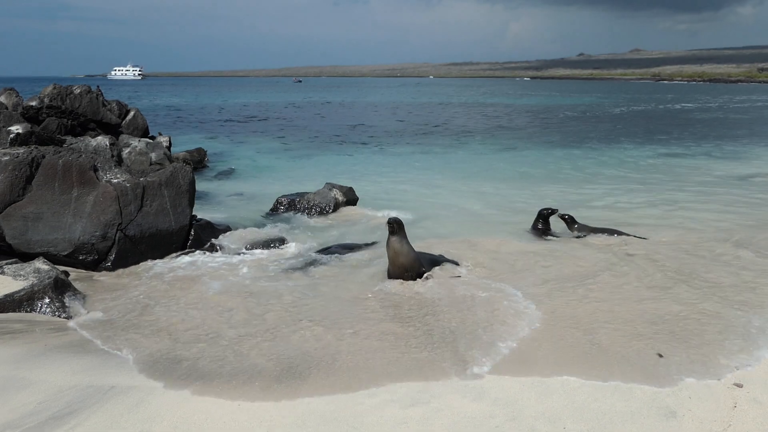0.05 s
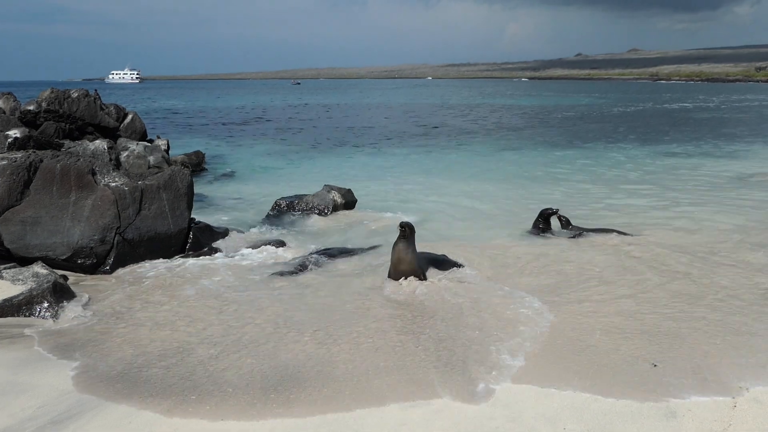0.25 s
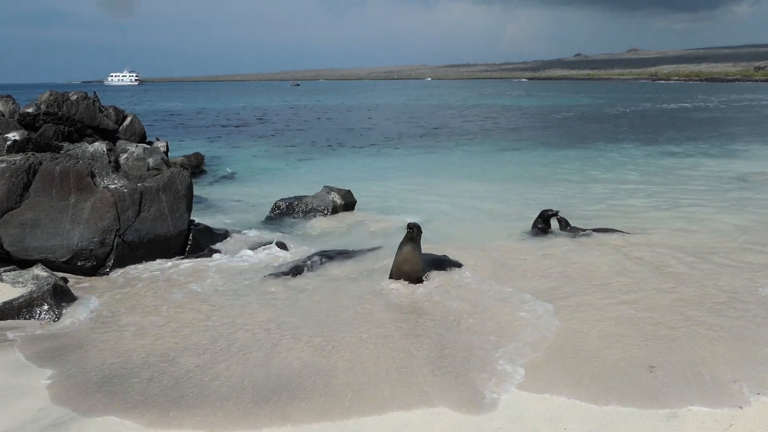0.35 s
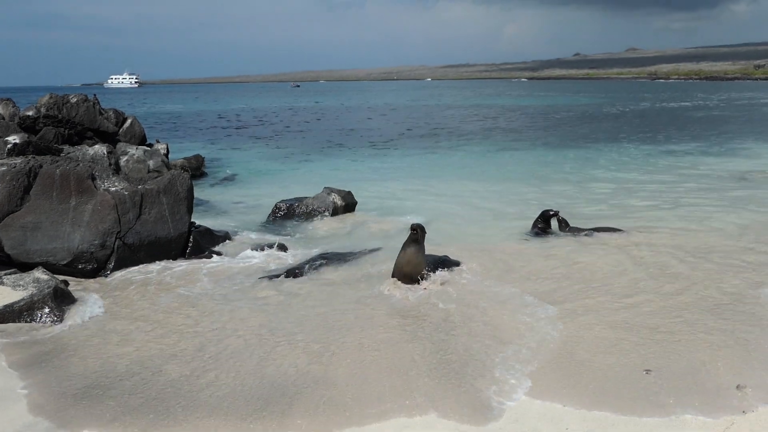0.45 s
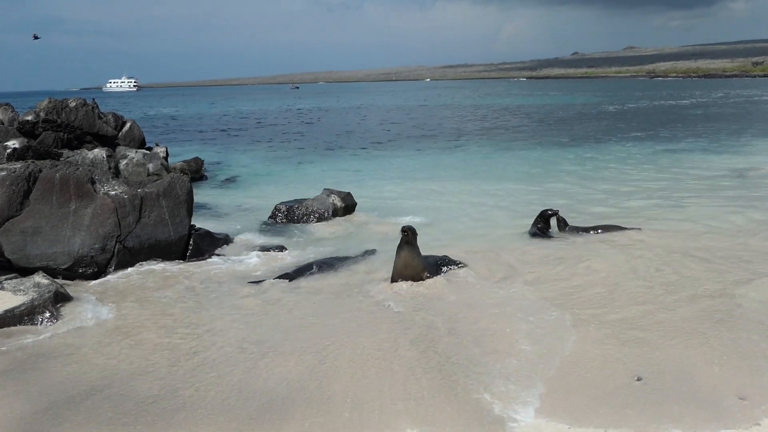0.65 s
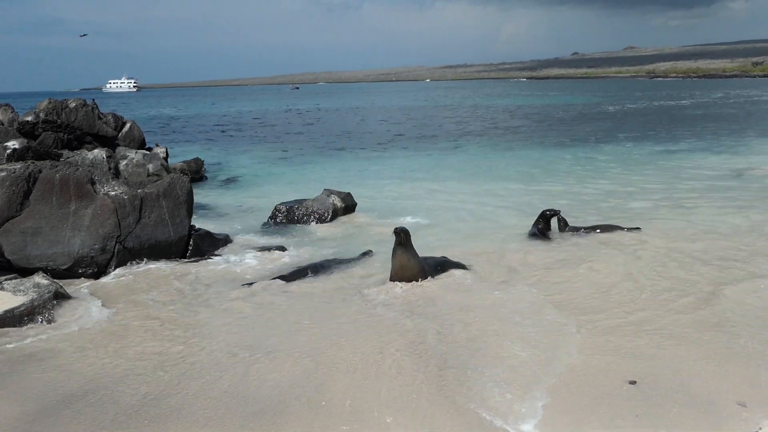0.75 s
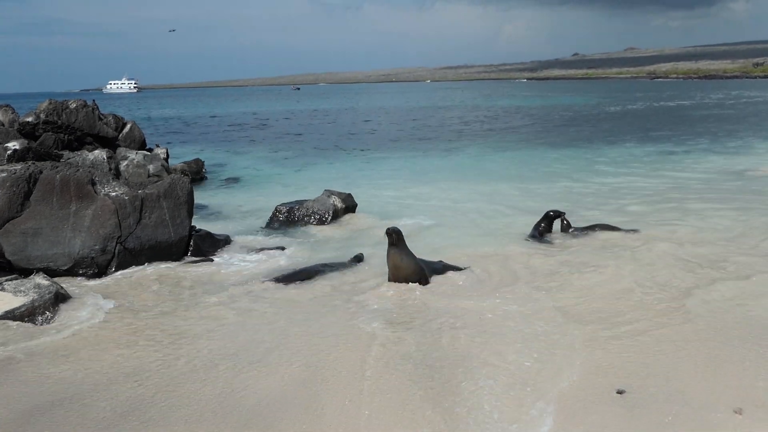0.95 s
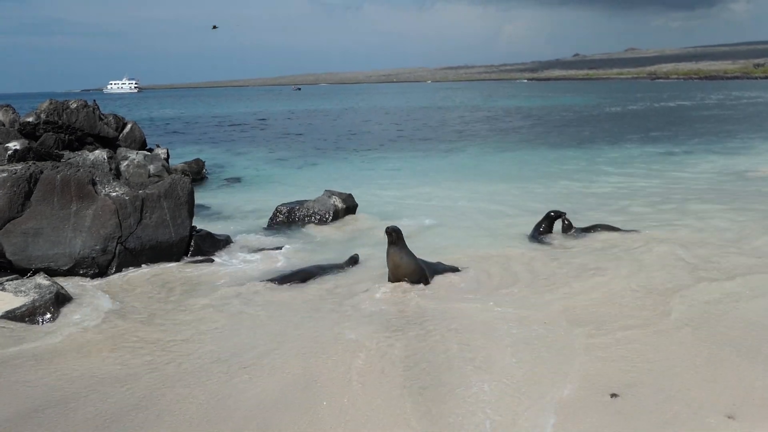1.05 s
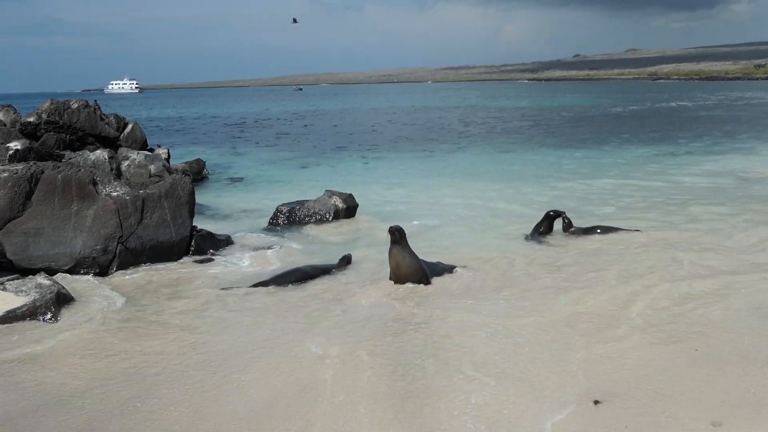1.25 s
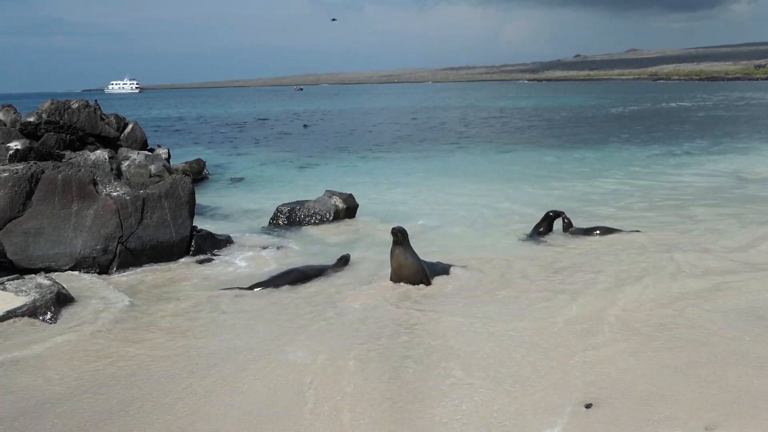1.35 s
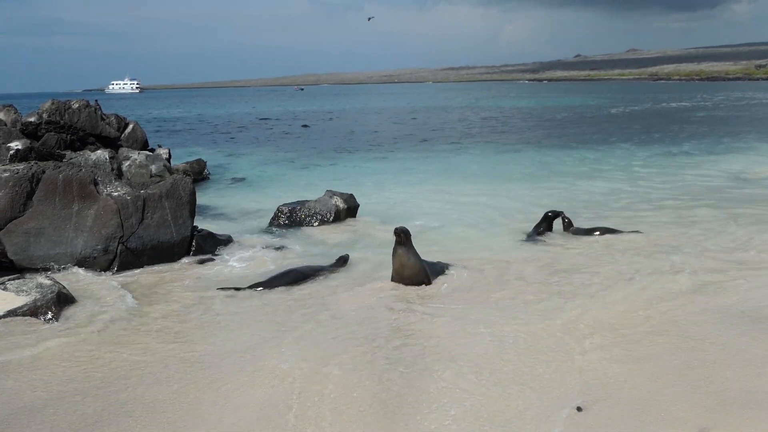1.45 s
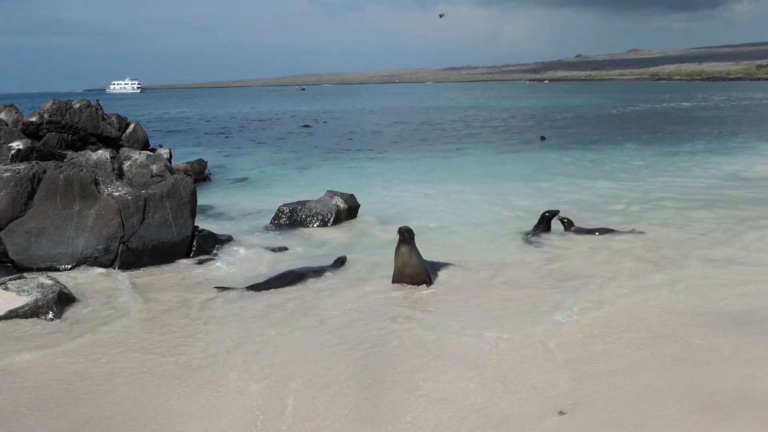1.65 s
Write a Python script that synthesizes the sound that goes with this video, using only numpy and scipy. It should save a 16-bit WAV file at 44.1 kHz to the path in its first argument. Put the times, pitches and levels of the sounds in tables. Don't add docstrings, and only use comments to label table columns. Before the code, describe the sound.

A sea lion growls close by: after silence until 0.19 s, the sound starts abruptly with a low, breathy rattle, coarse slaps thickening from 0.45 s, swelling to a short, throaty bark at 0.64-0.75 s that falls in pitch and ends by 0.83 s. Small waves wash, gurgle and fizz throughout with faint wind rumble. Another animal moans faintly at 0.83-1.14 s; foam sizzles from 1.1 s with tiny bubble pops.

```python
import sys
import numpy as np
from scipy import signal
from scipy.io import wavfile
from scipy.ndimage import uniform_filter1d

SR = 44100
rng = np.random.default_rng(int(sys.argv[2]) if len(sys.argv) > 2 else 0)


def unload_audio(sound):
    columns = np.transpose(np.atleast_2d(sound))
    steps = np.round(np.clip(columns, -1, 1) * 32767)
    wavfile.write(sys.argv[1], SR, steps.astype(np.int16))


def convert_level_to_amplitude(level_db):
    exponent = np.asarray(level_db, float) / 20
    return 10 ** exponent


N = 74970

# time_s, effort_db, flap_rate_hz, breath_share (0-1), unevenness (0-1)
CALL = [(.18, -35, 65.2, 1, 0.3), (.32, -27, 59.7, 0.55, .1), (.39, -30, 79.6, 0.99, 0.42),
        (.5, -28, 90.4, 0.75, 0.2), (.645, -22.5, 105, 1, 0.2), (.675, -16.5, 152, 1, .15),
        (.703, -21, 132, 0.64, 0), (.73, -18.5, 128, 0.44, 0.03), (.738, -25, 118, 0.66, 0.05),
        (.775, -27.5, 103, 0.68, 0.02), (.83, -30.5, 95, 0.1, 0.03)]
# time_s, first_hz, nasal_hz, second_hz, third_hz
MOUTH = [(.18, 630, 780, 1500, 2450), (.32, 590, 790, 1450, 2450), (.42, 600, 880, 1400, 2470),
         (.47, 520, 760, 1340, 2550), (.5, 400, 760, 1330, 2650), (.63, 410, 820, 1350, 2660),
         (.665, 480, 830, 1390, 2620), (.72, 520, 830, 1345, 2550), (.83, 500, 800, 1290, 2440)]
# width_hz, level_db
MOUTH_RINGS = [(102, -4), (90, -13), (153, -3.5), (295, -8.5)]
# centre_hz, width_hz, level_db
THROAT = [(285.5, 57, -4), (2130, 117, -16.5), (3153, 276, -11), (4096, 270, -13.5), (4370, 1200, -34.5),
          (5300, 68, -30.5)]
# time_s, level_db
JAW_OPENING = [(.18, -4.5), (.32, 4), (.39, -7.5), (.46, 2.5), (.55, 2), (.63, 3), (.7, 5.5), (.77, 1),
               (.83, 1)]
# time_s, peak_db
SLAPS = [(0.216, -18.5), (0.2227, -17), (0.2524, -22), (0.2776, -36), (0.29, -31), (0.3037, -17),
         (0.3204, -22), (0.336, -18), (0.3664, -31), (0.427, -26), (0.4655, -16), (0.477, -13.5),
         (0.4868, -17), (0.501, -13), (0.5265, -13), (0.535, -18), (0.5697, -12.5), (0.5947, -22),
         (0.604, -27), (0.6132, -19), (0.6231, -11), (0.6398, -5.5), (0.6563, -12), (0.673, -16),
         (0.6824, -12), (0.6959, -8)]
# time_s, pitch_hz, level_db
CHEST_TONE = [(.65, 292, -36), (.675, 288, -29), (.7, 284, -22), (.724, 266, -22), (.744, 240, -31),
              (.765, 228, -28), (.78, 220, -31), (.8, 212, -34), (.815, 205, -45)]
# time_s, pitch_hz, level_db
FLUTTERS = [
    [(.497, 400, -31), (.515, 400, -27), (.575, 395, -31), (.6, 400, -29), (.635, 415, -27),
     (.66, 440, -23), (.68, 455, -23), (.7, 450, -30)],
    [(.65, 520, -29), (.67, 525, -27), (.69, 570, -24), (.71, 548, -25), (.73, 595, -25), (.75, 595, -27),
     (.775, 560, -26), (.79, 555, -35)],
]
# time_s, hiss_db, narrow_gap_whistle_db
HISS_LEVEL = [(.18, -51, -60), (.3, -52.5, -59), (.4, -50.5, -54), (.45, -45.5, -50), (.5, -47, -56),
              (.56, -46.5, -55), (.61, -41.5, -54), (.68, -41.5, -59), (.74, -49, -60), (.8, -58, -66)]
# frequency_hz, density_db (per Hz)
HISS = [(5500, 10.5), (7500, 2), (9500, 5.5), (11500, 8.5), (14000, -13), (16000, -18)]
# frequency_hz, density_db (per Hz)
GAP_HISS = [(11500, -8), (13200, 0), (14300, 0), (16000, -8)]
# time_s, wash_db, fizz_db
SWELL = [(.18, 0, 4.5), (.5, 4, 4), (.8, 1, 3), (.9, -1, 5), (.94, -2, 4), (.97, 2, 4), (1.01, -1, 4.5),
         (1.05, 0, 4.5), (1.12, -1.5, 5), (1.23, 0, 6.5), (1.3, -0.5, 7), (1.37, 0, 3.5), (1.42, 1, 2.5),
         (1.49, -0.5, 5.5), (1.6, 0, 3.5), (1.7, -1.5, 3.5)]
# frequency_hz, density_db (per Hz)
WASH = [(40, -47), (110, -5.5), (320, 0.5), (900, -2), (1300, -8.5), (2400, -6.5), (4000, -13),
        (6500, -33.5)]
# frequency_hz, density_db (per Hz)
FIZZ = [(2800, 11), (4500, 4.5), (6000, -2.5), (8000, -1), (9700, 0), (12000, 3), (14300, -1.5),
        (16000, -14)]
# time_s, pitch_hz, rise_hz_per_s, length_s, level_db
POPS = [
    (1.092, 9400, 50000, .003, -42),
    (1.278, 1230, 3000, .006, -34),
    (1.115, 900, -1500, .008, -37),
    (1.165, 180, 200, .014, -36),
]
# time_s, pitch_hz, level_db
FAR_MOAN = [(.83, 285, -44), (.9, 305, -38), (1.0, 295, -41), (1.1, 300, -39), (1.14, 290, -47)]
# frequency_hz, likeness (-1 to 1)
LIKENESS = [(40, -.1), (80, 0.97), (200, 1), (500, 0.79), (1500, 0.78), (3500, 0.82), (6000, -0.29),
            (10000, 0.29)]
# frequency_hz, lean_db
LEAN = [(60, 1), (150, 0.5), (500, 0.3), (1000, -0.1), (4000, 0), (12000, -1)]

FLAP_SPREAD_DB, FLAP_SOFT_HZ, PUFF_S, STEADY_BREATH = 2.5, 2460, 0.0068, 0.7
RING_SPREAD_DB, EVEN_S, LAST_STRONG_FLAP_S = 3, 0.012, 0.7281
SLAP_DB, SLAP_LAG_S, SLAP_PUFF_S, SLAP_BREATH, SLAP_OPEN_DB = 0.5, 0.001, 0.0033, 0.6, 3.5
TONE_WOBBLE, FLUTTER_WOBBLE, OVERTONE_DB, THROB_DB = 0.012, 0.007, -9, 3.5
SUNG_FLICKER_DB, SUNG_EDGE_S = 1.3, 0.012
ECHO_S, ECHO_DB = 0.00272, -19
WASH_DB, FIZZ_DB, GURGLES_PER_S, GURGLE_DB = -32, -50.5, 68, -42
FOAM_S, FOAM_RISE_S, FOAM_FADE_S = 1.09, 0.03, 0.2
FOAM_HZ, FOAM_WIDTH_HZ, FOAM_DB = 9900, 1300, -47.5
WIND_DB, WIND_HZ = -48.5, 90
NOTCH_HZ, NOTCH_WIDTH_HZ, CUTOFF_HZ, START_S = 3010, 460, 15820, 0.1883


def sea_lion():
    effort_db, rate, breath, uneven = in_time(CALL)
    cycles = np.cumsum(rate * np.exp(uneven * drift(60))) / SR
    cycles = cycles - cycles[int(LAST_STRONG_FLAP_S * SR)]
    growl = through_mouth(folds(cycles, breath) * convert_level_to_amplitude(RING_SPREAD_DB * drift(35.4)), 2.85, 1)
    growl = growl / np.sqrt(uniform_filter1d(growl ** 2, int(EVEN_S * SR)) + 1e-12)
    slapped = through_mouth(slaps(), 3, 1.72, SLAP_OPEN_DB)
    fade = np.clip((CALL[-1][0] - np.arange(N) / SR) / 0.032, 0, 1)
    throb = convert_level_to_amplitude(THROB_DB * (np.cos(2 * np.pi * cycles) - 1.0))
    near = convert_level_to_amplitude(effort_db) * growl * fade + convert_level_to_amplitude(23) * slapped
    near = near + sung(CHEST_TONE, TONE_WOBBLE, convert_level_to_amplitude(OVERTONE_DB))
    near = near + throb * sum(sung(rows, FLUTTER_WOBBLE) for rows in FLUTTERS)
    lag = int(ECHO_S * SR)
    echo = convert_level_to_amplitude(ECHO_DB) * np.concatenate([np.zeros(lag), near[:N - lag]])
    return near + echo * [[1], [-1]] + fade * teeth_hiss()


def folds(cycles, breath):
    flaps = np.diff(np.floor(cycles), prepend=np.floor(cycles[0])) * convert_level_to_amplitude(FLAP_SPREAD_DB * drift(57))
    puffs = rms_one(decay(flaps, PUFF_S)) + STEADY_BREATH
    clicks = decay(flaps, 1 / (2 * np.pi * FLAP_SOFT_HZ))
    breath = np.clip(breath, 0, 1)
    return (1 - breath) * rms_one(clicks) + breath * rms_one(puffs * rng.standard_normal(N))


def slaps():
    s, db = np.transpose(SLAPS)
    clicks = np.zeros(N)
    clicks[((s + SLAP_LAG_S) * SR).astype(int)] = convert_level_to_amplitude(db + SLAP_DB)
    puff = decay(clicks, SLAP_PUFF_S) * rng.standard_normal(N)
    return SLAP_BREATH * puff / np.sqrt(SLAP_PUFF_S * SR / 2) - clicks + 1e-18


def through_mouth(source, first_width, second_width, extra_open_db=0):
    (open_db,) = in_time(JAW_OPENING)
    open_db = extra_open_db if extra_open_db else open_db
    rings = [(hz, width, db) for hz, (width, db) in zip(in_time(MOUTH), MOUTH_RINGS)]
    rings = sorted(rings + list(THROAT), key=lambda ring: np.mean(ring[0]))
    out = 0
    for k, (hz, width, db) in enumerate(rings):
        ring = resonance(resonance(source, hz, first_width * width), hz, second_width * width)
        out = out + (-1) ** k * convert_level_to_amplitude(db + open_db * (np.mean(hz) > 1000)) * ring
    return out


def sung(rows, wobble, octave=0):
    t, (pitch, level_db) = np.arange(N) / SR, in_time(rows)
    edge = np.clip(np.minimum(t - rows[0][0], rows[-1][0] - t) / SUNG_EDGE_S, 0, 1)
    phase = 2 * np.pi * np.cumsum(pitch * (1 + wobble * drift(50.0))) / SR
    level = np.sqrt(2) * convert_level_to_amplitude(level_db + SUNG_FLICKER_DB * drift(58))
    return level * edge * (np.sin(phase) + octave * np.sin(2 * phase))


def teeth_hiss():
    hiss_db, gap_db = in_time(HISS_LEVEL)
    hiss = convert_level_to_amplitude(hiss_db) * banded_noise(HISS, patchy_db=0.6)
    return hiss + convert_level_to_amplitude(gap_db) * banded_noise(GAP_HISS, patchy_db=0.6)


def surf():
    wash_db, fizz_db = in_time(SWELL)
    wash = convert_level_to_amplitude(WASH_DB) * banded_noise(WASH, patchy_db=1.0) + convert_level_to_amplitude(GURGLE_DB) * rms_one(gurgles())
    return convert_level_to_amplitude(wash_db) * wash + convert_level_to_amplitude(FIZZ_DB + fizz_db) * banded_noise(FIZZ, patchy_db=1.9)


def gurgles():
    strikes = rng.choice([-1, 1], N) * (rng.random(N) < GURGLES_PER_S / SR)
    strikes = strikes * convert_level_to_amplitude(2.1 * np.minimum(rng.exponential(1, N), 3))
    pocket = rng.integers(0, 16, N)
    out = 0
    for k, hz in enumerate(np.geomspace(200, 1300, 16)):
        struck = strikes * (pocket == k) + 1e-18
        out = out + resonance(resonance(struck, hz, hz / 2), hz, hz / 16) / hz
    return out


def foam():
    t = np.arange(N) / SR
    since = np.maximum(t - FOAM_S, 0)
    shape = (1 - np.exp(-since / FOAM_RISE_S)) * np.exp(-(since / FOAM_FADE_S) ** 2)
    grains = [rng.standard_normal(N) * convert_level_to_amplitude(1.7 * drift(70)) for _ in range(2)]
    sizzle = np.array([rms_one(resonance(x, FOAM_HZ, FOAM_WIDTH_HZ)) for x in grains])
    pops = 0
    for s, hz, rise, length, db in POPS:
        burst = np.exp(-0.5 * ((t - s) / length) ** 2)
        turns = hz * (t - s) + rise * (t - s) ** 2 / 2
        pops = pops + convert_level_to_amplitude(db) * burst * np.sin(2 * np.pi * turns)
    return convert_level_to_amplitude(FOAM_DB) * shape * sizzle + pops


def wind():
    sos = signal.butter(2, [WIND_HZ / 1.19, WIND_HZ * 1.9], "band", fs=SR, output="sos")
    ports = []
    for side_db in (-1.5, 1.5):
        rumble = rms_one(signal.sosfilt(sos, rng.standard_normal(N)))
        ports.append(convert_level_to_amplitude(3.45 * drift(5.4) + side_db) * rumble)
    return convert_level_to_amplitude(WIND_DB) * np.array(ports)


def far_moan():
    return sung(FAR_MOAN, FLUTTER_WOBBLE)


def rms_one(x):
    return x / np.sqrt(np.mean(x ** 2) + 1e-20)


def in_time(rows):
    s, *columns = np.transpose(rows)
    return [np.interp(np.arange(N) / SR, s, c) for c in columns]


def at_hz(points, hz):
    table_hz, values = np.transpose(points)
    return np.interp(np.log(hz), np.log(table_hz), values)


def decay(x, seconds):
    return signal.lfilter([1], [1, -np.exp(-1 / (seconds * SR))], x)


def drift(rate):
    r = np.exp(-80 * np.pi * rate / SR)
    slow = signal.lfilter([1], [1, -2 * r, r * r], rng.standard_normal(N // 40 + 2002))[2000:]
    return np.interp(np.arange(N) / 40, np.arange(len(slow)), rms_one(slow))


def resonance(x, hz, width_hz):
    hz, r = np.broadcast_to(hz, N), np.exp(-np.pi * width_hz / SR)
    out, state = np.zeros(N), np.zeros(2)
    size = N if np.ptp(hz) == 0 else 128
    top = [(1 - r * r) / 2, 0, (r * r - 1) / 2]
    for i in range(0, N, size):
        bottom = [1, -2 * r * np.cos(2 * np.pi * hz[i] / SR), r * r]
        out[i:i + size], state = signal.lfilter(top, bottom, x[i:i + size], zi=state)
    return out


def banded_noise(spectrum, patchy_db):
    out, together = 0, drift(1.8)
    lowest, highest = spectrum[0][0], spectrum[-1][0]
    edges = np.geomspace(lowest, highest, int(3 * np.log2(highest / lowest)) + 2)
    white = rng.standard_normal((2, 2, N))
    for k, (low, high) in enumerate(zip(edges, edges[1:])):
        band = signal.butter(2, [low, high], "band", fs=SR, output="sos")
        mid, side = signal.sosfilt(band, white[k % 2])
        hz = np.sqrt(low * high)
        alike = np.clip(at_hz(LIKENESS, hz), -1, 1)
        flicker_db = patchy_db * (0.45 * together + drift(31.0))
        gain = convert_level_to_amplitude(at_hz(spectrum, hz) + flicker_db + at_hz(LEAN, hz) * np.array([[1], [-1]]))
        out = out + gain * (np.sqrt(1 + alike) * mid + np.sqrt(1 - alike) * side * [[1], [-1]])
    return rms_one(out)


def scene():
    return sea_lion() + surf() + foam() + wind() + far_moan()


def top_cut(x):
    return signal.sosfilt(signal.butter(12, 16310, fs=SR, output="sos"), x)


def record(dry):
    x = signal.lfilter(*signal.iirnotch(NOTCH_HZ, NOTCH_HZ / NOTCH_WIDTH_HZ, fs=SR), dry)
    x = signal.sosfilt(signal.cheby2(22, 55, CUTOFF_HZ + 110, fs=SR, output="sos"), x)
    mix = x * np.clip((np.arange(N) / SR - START_S) * SR, 0, 1)
    return top_cut(mix)


dry = scene()
out = record(dry)
unload_audio(out)
```